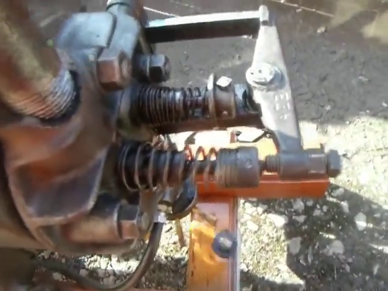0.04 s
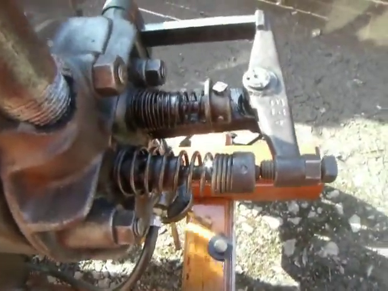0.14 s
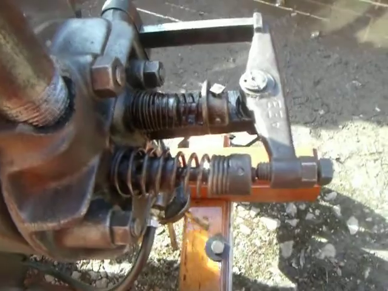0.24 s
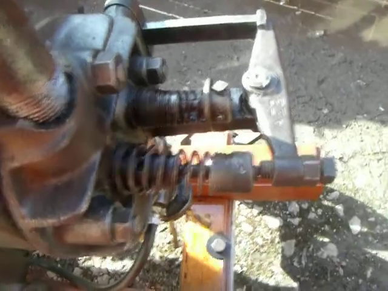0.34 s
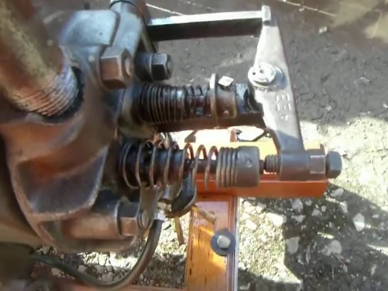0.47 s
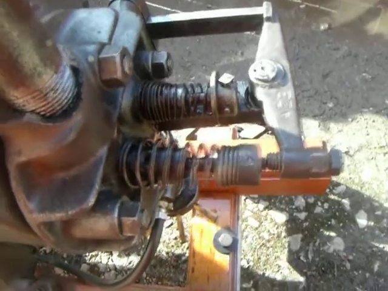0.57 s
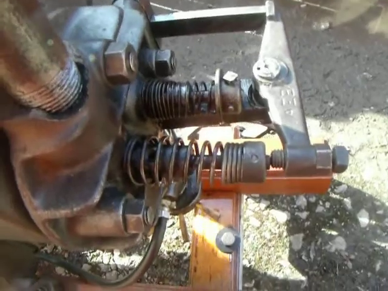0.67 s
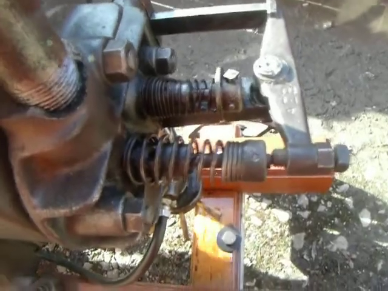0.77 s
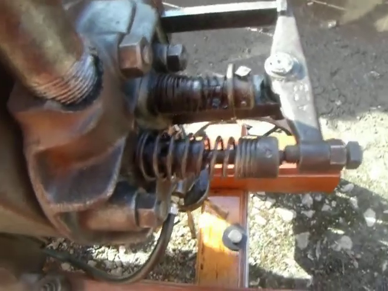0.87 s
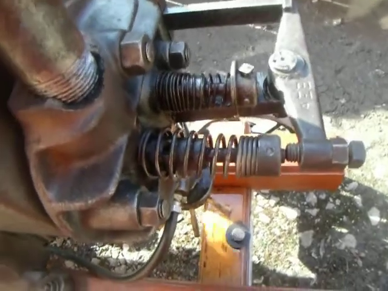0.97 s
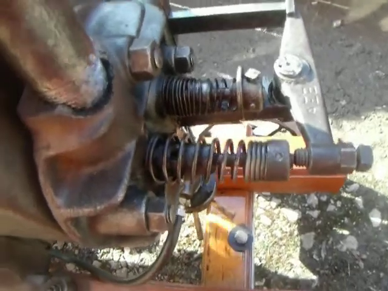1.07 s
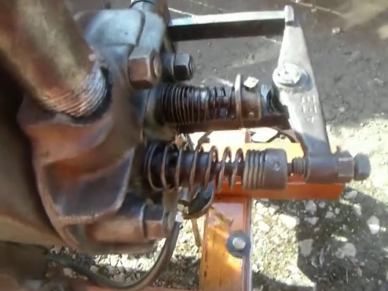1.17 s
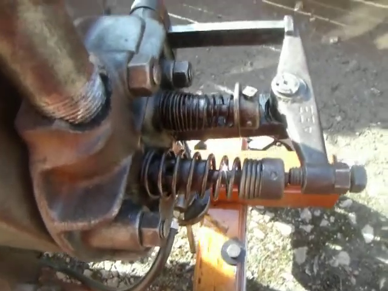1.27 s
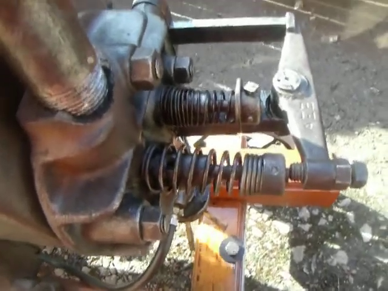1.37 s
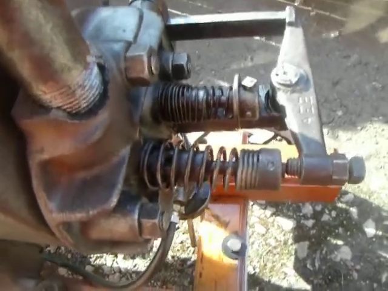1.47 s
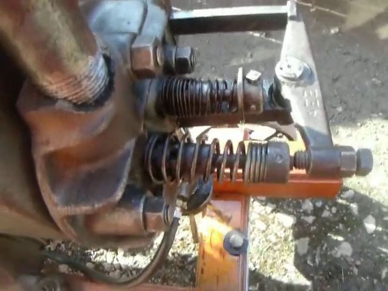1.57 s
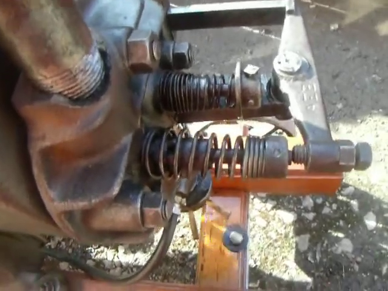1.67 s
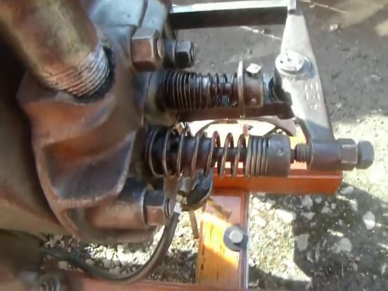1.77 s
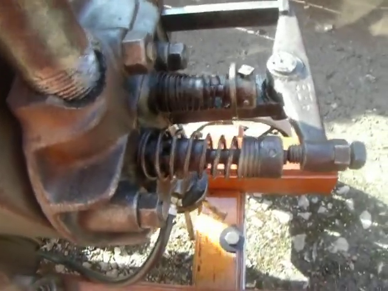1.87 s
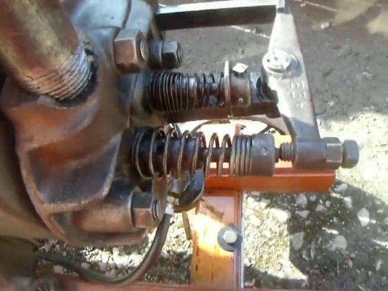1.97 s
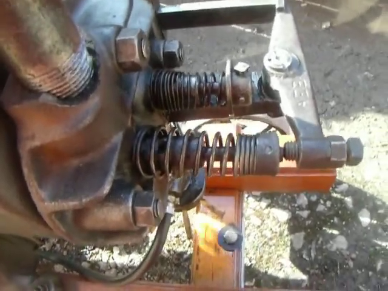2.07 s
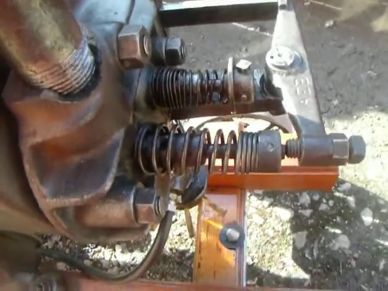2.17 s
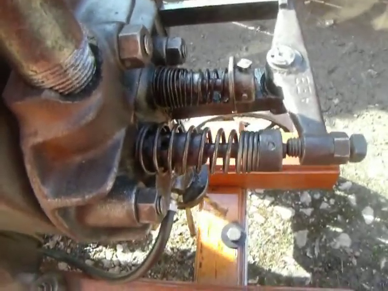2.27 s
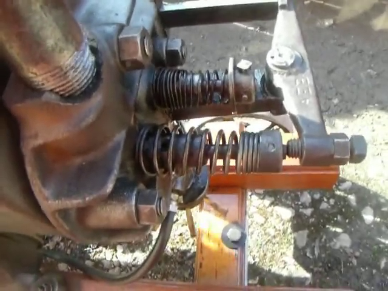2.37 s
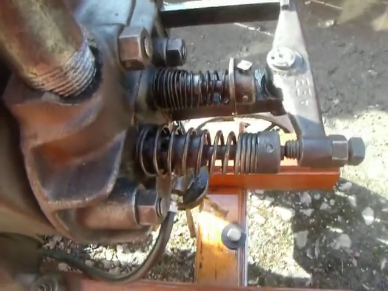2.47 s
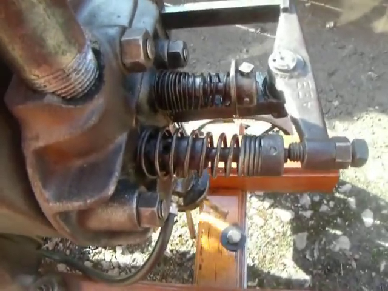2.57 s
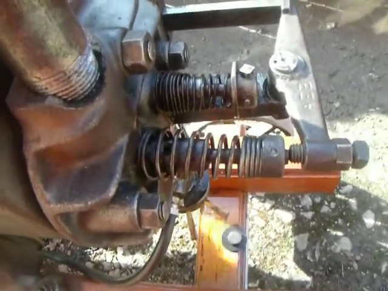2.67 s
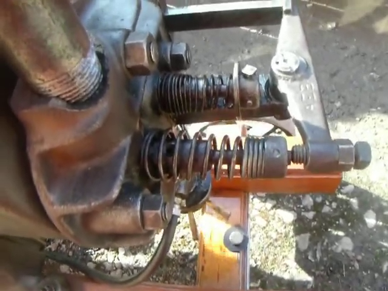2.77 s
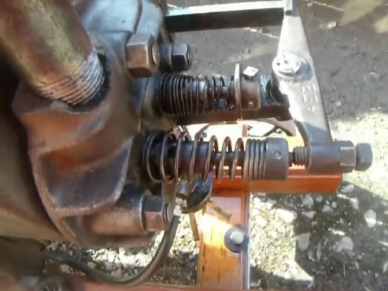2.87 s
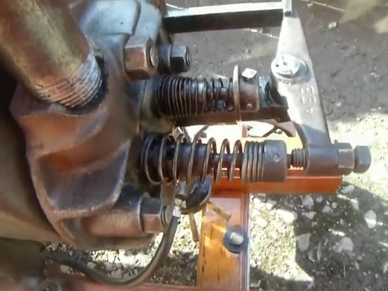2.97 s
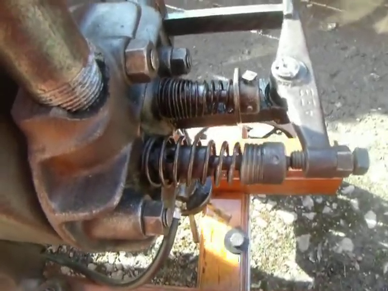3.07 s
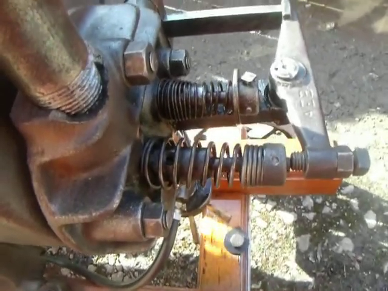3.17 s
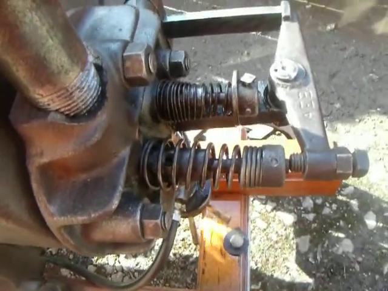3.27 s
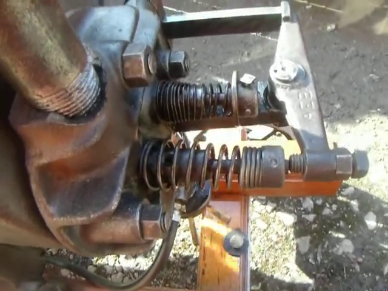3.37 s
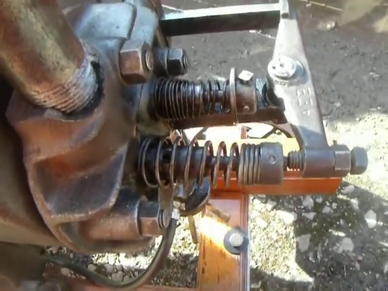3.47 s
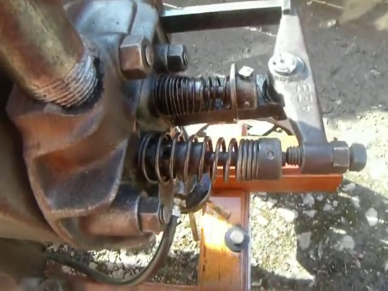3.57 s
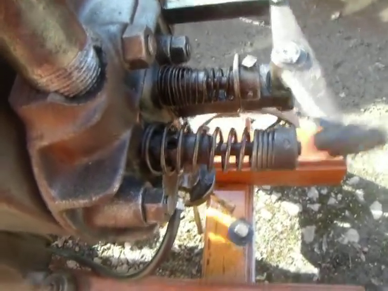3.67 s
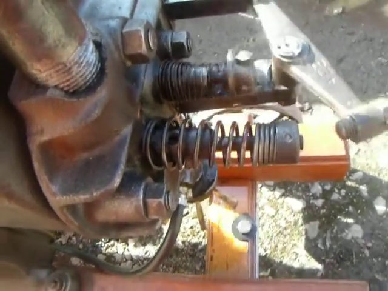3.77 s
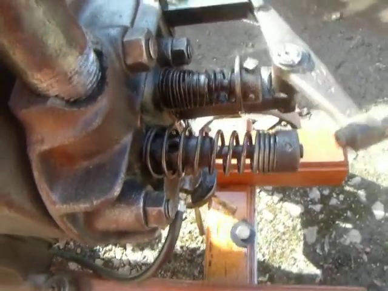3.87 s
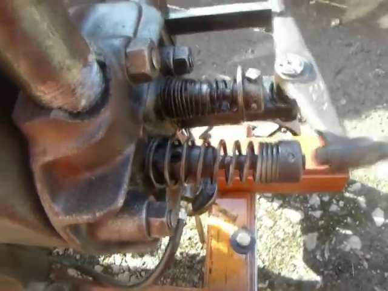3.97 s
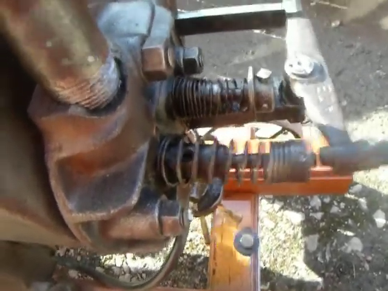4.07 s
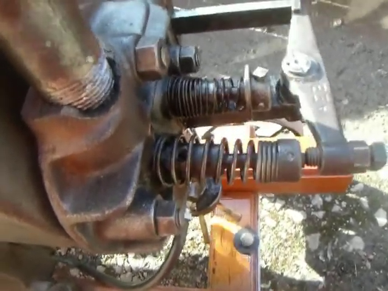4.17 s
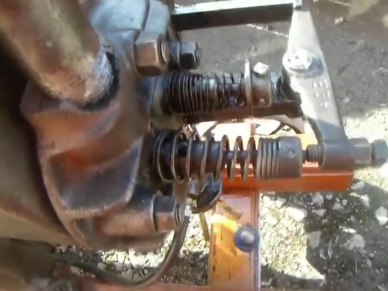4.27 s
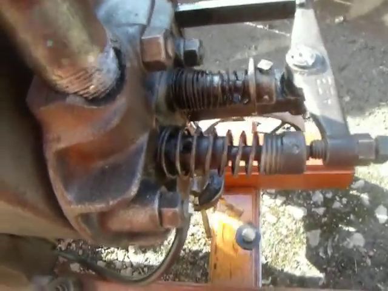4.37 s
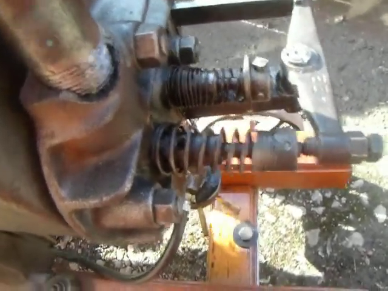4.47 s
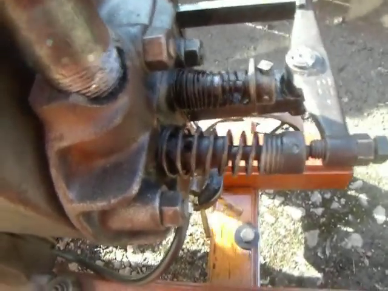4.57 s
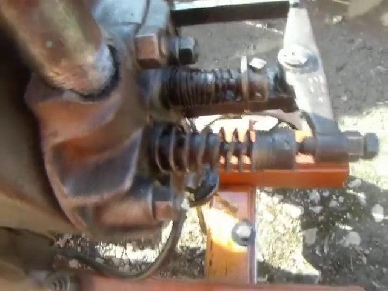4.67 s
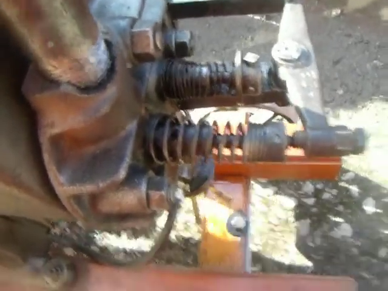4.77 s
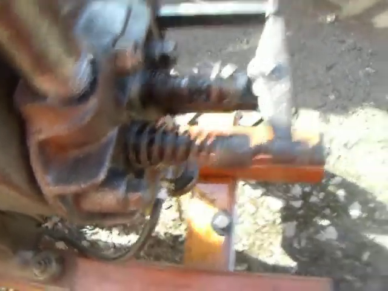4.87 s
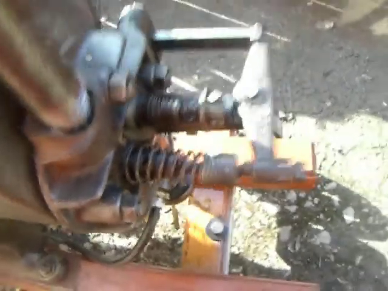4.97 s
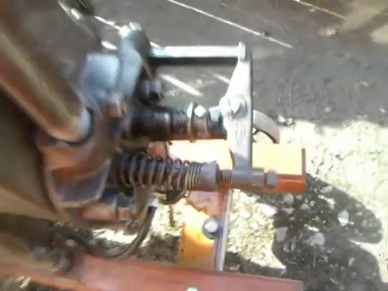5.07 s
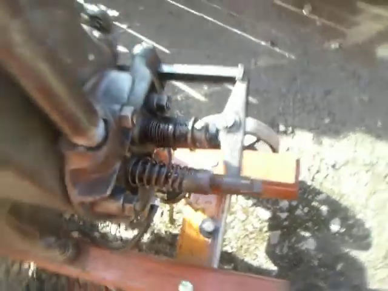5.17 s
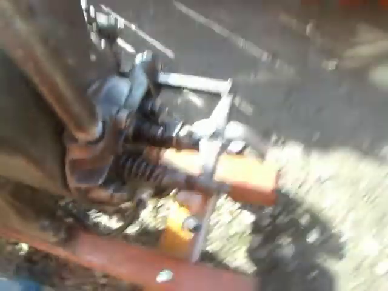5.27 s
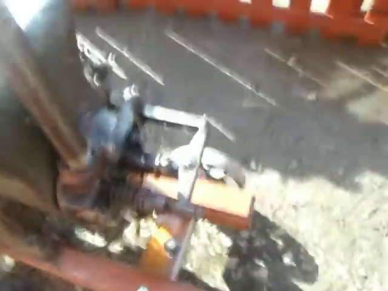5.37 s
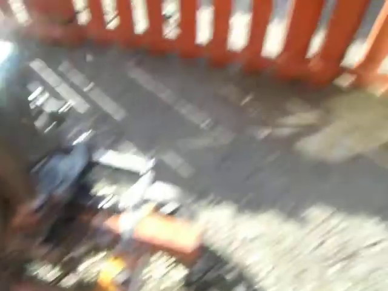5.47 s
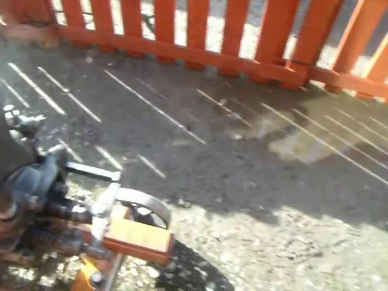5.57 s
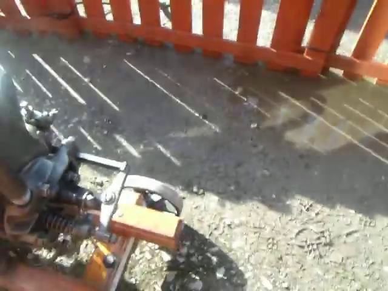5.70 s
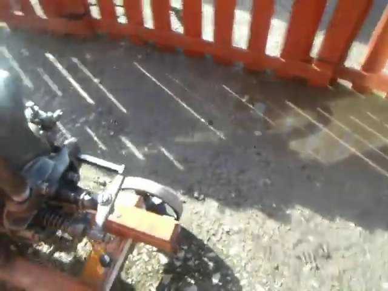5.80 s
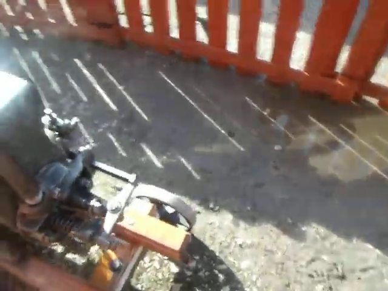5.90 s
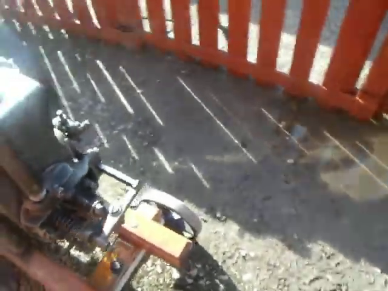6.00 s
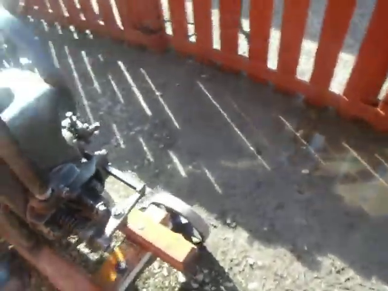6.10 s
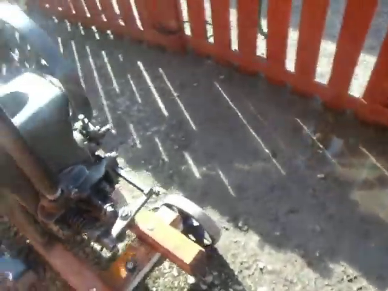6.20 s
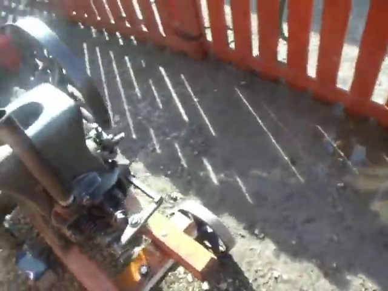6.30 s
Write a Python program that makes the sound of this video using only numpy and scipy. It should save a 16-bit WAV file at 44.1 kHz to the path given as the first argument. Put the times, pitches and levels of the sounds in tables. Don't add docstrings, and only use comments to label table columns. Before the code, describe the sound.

Rapid iron valve-gear clatter and breathy pipe puffs from a coasting engine, one overloaded bang midway, over fast chugging and slow deep thumps.

```python
import sys
import numpy as np
from scipy import signal
from scipy.io import wavfile
from scipy.ndimage import uniform_filter1d

SR = 44100
rng = np.random.default_rng(int(sys.argv[2]) if len(sys.argv) > 2 else 0)


def boost(x):
    u = np.asarray(x, float) / 20
    return 10 ** u


def pcm_store(signal):
    levels = np.round(np.clip(np.atleast_2d(signal), -1, 1) * 32767)
    wavfile.write(sys.argv[1], SR, levels.astype(np.int16).T)


N = 279594


def evened(x):
    return x / np.sqrt(np.mean(x ** 2) + 1e-20)


def steadied(x, share):
    return evened(x / (uniform_filter1d(x ** 2, size=500) + .02) ** (share / 2))


def clock(s):
    return np.arange(round(s * SR)) / SR


def curve(points):
    return np.interp(np.arange(N) / SR, *np.transpose(points))


def add(mix, s, sound):
    at = round(s * SR)
    sound = sound[max(-at, 0):]
    part = mix[max(at, 0):][:len(sound)]
    part += sound[:len(part)]


def band(lo_hz, hi_hz):
    sos = signal.butter(2, [lo_hz, hi_hz], "band", fs=SR, output="sos")
    return evened(signal.sosfilt(sos, rng.standard_normal(N)))


def resonate(x, hz, width_hz):
    turn = np.exp(2j * np.pi * np.cumsum(hz * np.ones(len(x))) / SR)
    r = np.exp(-np.pi * width_hz / SR)
    return 2 * (turn * signal.lfilter([1 - r], [1, -r], x / turn)).real


def struck(t, hz, db, t60):
    return boost(db - 60 * t / t60) * np.sin(2 * np.pi * hz * t)


def gusts(per_s, spread_db):
    flutter = uniform_filter1d(rng.standard_normal(N), max(int(SR / per_s), 1))
    return boost(spread_db * evened(flutter))


def swells(rows, sharp):
    flow = np.zeros((len(rows[0]) - 2, N))
    for s, *level_db, length_s in rows:
        t = clock(length_s)
        for part, db in zip(flow, level_db):
            add(part, s - length_s / 2, boost(db) * np.sin(np.pi * t / length_s) ** sharp)
    return flow


def pipe(modes, lo_hz, hi_hz, hiss_db):
    air, tones = rng.standard_normal(N), np.zeros(N)
    for k, (hz, width_hz, db) in enumerate(modes):
        if lo_hz < hz < hi_hz:
            tones += (-1) ** k * boost(db) / np.sqrt(width_hz) * resonate(air, hz, width_hz)
    return evened(evened(tones) + boost(hiss_db) * band(max(lo_hz, 900), hi_hz))


# (time [s], knock [dB], valve-seat whistle [dB], lower pipe tones [dB])
CAM = [(-.29, -6, -28.5, -22), (0.1485, -7.5, -30, -25), (0.599, -5, -29, -24), (1.0663, -6, -29.5, -27.5),
       (1.549, -6, -30.5, -27), (2.048, -4, -32.5, -30), (2.5631, -6, -31, -29), (3.101, -7.5, -35, -30),
       (3.658, -7.5, -34, -28), (4.17, -13, -26, -24), (4.5466, -4.5, -27, -23.5),
       (4.927, -6.5, -26, -22.5), (5.312, -18, -29, -24.5), (5.7156, -9.5, -32.5, -27),
       (6.126, -12, -40, -18), (6.54, -9, -38, -30)]
DRAW_AT = (0.18, 0.686)


def draws():
    rows = []
    for (s, _, seat_db, low_db), after in zip(CAM, CAM[1:]):
        turn_s = after[0] - s
        rows += [(s + at * turn_s, seat_db, low_db, 0.18 * turn_s) for at in DRAW_AT]
    return rows


# (centre [s], low tones [dB], upper tones [dB], treble [dB], length [s])
BLOWS = [(0.359, -19.5, -23.5, -30.5, 0.068), (0.822, -17, -23, -32, 0.057),
         (1.286, -21.5, -25.5, -33, 0.07), (1.775, -20.5, -29, -32.5, 0.072),
         (2.284, -23, -30.5, -35, 0.081), (2.811, -23.5, -31.5, -34.5, 0.092),
         (3.365, -22, -38, -39, 0.092), (4.345, -15, -21.5, -28.5, 0.057),
         (4.722, -15, -22.5, -25.5, 0.057), (5.103, -14, -16.5, -27.5, 0.067),
         (5.495, -19.5, -21, -30.5, 0.078), (5.905, -22.5, -22.5, -34, 0.063),
         (6.322, -25, -26.5, -36.5, 0.057)]
# (centre [s], low [dB], upper [dB], treble [dB], length [s])
GASPS = [(0.153, -29, -24, -39.5, 0.019), (0.898, -18.5, -22, -29, 0.065), (3.853, -22, -19, -27.5, 0.076),
         (4.171, -22.5, -26, -27.5, 0.12), (4.525, -25, -33, -44, 0.046), (4.9, -31, -35, -43, 0.13),
         (5.31, -19.5, -30, -50, 0.081), (5.69, -30.5, -35, -45, 0.1), (6.19, -19.5, -17, -35, 0.046),
         (3.735, -35.5, -33, -35, 0.14), (6.215, -25, -28, -41, .05)]
# (frequency [Hz], width [Hz], level [dB])
PIPE_OUT = [(547, 130, 1), (936, 210, 6), (1399, 12, 1.5), (1850, 69, 5.5), (2294, 58, 5), (2815, 50, 4.5),
            (3250, 41, -6), (3540, 59, -25), (4440, 83, -13.5), (4503, 140, -14.5), (5064, 180, -14.5)]
# (frequency [Hz], width [Hz], level [dB])
PIPE_IN = [(1300, 90, 0), (1800, 17, 0.5), (2210, 48, -7), (2770, 60, -18), (3150, 42, -24),
           (3780, 70, -13), (4250, 98, -12.5), (4920, 200, -8.5)]
# (frequency [Hz], width [Hz], level [dB])
INLET = [(1429, 19, -1.5), (1995, 74, -4.5), (2260, 40, -4), (2520, 32, -11), (2625, 18, -4.5),
         (3040, 32, -8.5), (3350, 32, -10), (3900, 110, -10.5), (4760, 42, -14)]


def breathing():
    parts_hz = [(400, 2100), (2100, 3500), (3500, 5600)]
    tones = np.array([pipe(PIPE_OUT, lo, hi, db) for (lo, hi), db in zip(parts_hz, (-13.0, -14.0, -3.0))])
    hiss = np.array([pipe(INLET, lo, hi, -4) for lo, hi in parts_hz])
    out = (swells(BLOWS, 1.48) * tones).sum(0) * gusts(250, 0.73)
    out += (swells(GASPS, 2.3) * hiss).sum(0) * gusts(150, 1.6)
    seat, lower = swells(draws(), 0.99)
    back = seat * pipe(PIPE_IN, 2900, 6700, -1.3) + lower * pipe(PIPE_IN, 890, 3500, -17.5)
    return boost(0.5) * out + boost(-4.5) * back * gusts(200, 0.54)


# (centre [s], frequency [Hz], level [dB], length [s])
SINGS = [(.355, 882, -17, .025), (.359, 1844, -19, .025), (.365, 261, -14.5, .07), (.43, 254, -20, .06),
         (.535, 350, -15.5, .035), (.61, 949, -18, .025), (.823, 2842, -18, .035), (.826, 1900, -17, .035),
         (.886, 2885, -22, .015), (.894, 1800, -17, .02), (1.555, 4400, -22, .014),
         (1.552, 3840, -23, .014), (1.63, 1850, -26, .045), (1.765, 2800, -23, .03),
         (1.783, 1900, -23, .03), (2.055, 1276, -19, .02), (3.015, 330, -13.5, .025),
         (3.105, 2045, -15, .016), (3.104, 615, -17, .012), (3.66, 1378, -17, .025),
         (3.664, 2150, -21, .015), (3.843, 1808, -16.5, .018), (3.849, 2520, -20, .015),
         (3.851, 3509, -19, .015), (3.853, 1263, -16, .02), (3.871, 1485, -17, .02),
         (4.003, 1981, -20, .018), (4.111, 1184, -13, .015), (4.112, 2040, -11.5, .018),
         (4.107, 4494, -16, .014), (4.179, 796, -13, .02), (4.346, 2540, -22, .02), (4.352, 2026, -17, .02),
         (4.356, 1102, -16, .02), (4.546, 2368, -20, .015), (4.554, 944, -14, .02),
         (4.741, 1920, -17, .025), (4.911, 539, -12, .03), (5.086, 2330, -19, .03), (5.094, 1340, -16, .02),
         (5.098, 2820, -16, .025), (5.114, 1330, -18, .02), (5.118, 2310, -17.5, .025),
         (5.31, 560, -15, .025), (5.905, 1870, -18, .04), (5.912, 2850, -22.5, .035),
         (6.154, 1399, -20, .025), (6.186, 1225, -16, .02), (6.2, 640, -20, .025)]


def sings():
    mix = np.zeros(N)
    for s, hz, db, length_s in SINGS:
        t = clock(length_s)
        swell = np.sin(np.pi * t / length_s) ** 2
        add(mix, s - length_s / 2, boost(db) * swell * np.sin(2 * np.pi * hz * t))
    return mix


# (centre [s], level [dB], length [s])
BOOMS = [(.08, -19, 0.21), (.35, -13, 0.15), (.5, -23.5, 0.47), (.73, -17, 0.15), (.9, -16.5, 0.12),
         (1.05, -14.5, 0.14), (1.245, -13, 0.11), (1.45, -23, 0.94), (1.82, -16.5, 0.23),
         (2.05, -20.5, 0.07), (2.15, -10, .12), (2.34, -23, 0.054), (2.55, -17, 0.24), (2.83, -35, 0.26),
         (3.05, -14, 0.28), (3.36, -10.5, 0.066), (3.48, -17, 0.19), (3.63, -25.5, 0.11),
         (3.88, -17.5, 0.63), (4.08, -18.5, .24), (4.34, -17.5, 0.44), (4.54, -12.5, 0.14),
         (4.79, -14.5, 0.29), (4.93, -15, 0.092), (5.27, -18, 0.41), (5.68, -14, 0.14), (5.98, -22.5, 1),
         (6.27, -31, 0.5)]
# (centre [s], level [dB], length [s])
ROARS = [(.14, -7.5, 0.096), (.35, -9.5, 0.13), (.55, -12, 0.14), (.8, -15.5, 0.22), (.91, -12.5, 0.085),
         (1.06, -8, 0.12), (1.28, -10.5, 0.17), (1.52, -12.5, 0.12), (1.775, -15.5, 0.13), (2.03, -17, 0.2),
         (2.15, -14, 0.14), (2.28, -15.5, .1), (2.55, -15, 0.14), (2.8, -16.5, 0.15), (3.04, -17.5, 0.21),
         (3.36, -17.5, 0.12), (3.49, -20, 0.1), (3.63, -16.5, 0.1), (3.87, -12, 0.22), (4.16, -10.5, 0.21),
         (4.33, -10, 0.2), (4.53, -8.5, 0.14), (4.71, -11, 0.098), (4.84, -13.5, 0.48), (5.1, -22.5, 0.6),
         (5.31, -8, 0.088), (5.49, -20, 0.094), (5.69, -15.5, 0.11), (5.93, -31, 0.93), (6.22, -22.5, 0.51)]


def churn():
    cavity_hz, slide_hz, slide_at_turns = 252.3, 12, .4
    turns = curve([(row[0], k) for k, row in enumerate(CAM)])
    hz = cavity_hz + slide_hz * np.cos(2 * 2 * np.pi * (turns - slide_at_turns))
    air = rng.standard_normal(N)
    hum = steadied(evened(resonate(resonate(air, hz, 100), hz, 150)), .6)
    boom = hum * (swells(BOOMS, 1.3)[0] + boost(-31.5))
    roar = evened(resonate(air, 2 * hz, 45)) * boost(-2.0) + band(260, 1290)
    roar *= swells(ROARS, 2.17)[0] + boost(-30)
    return (boost(-7.5) * boom + boost(-11.0) * roar) * gusts(120, 2.1)


# (time [s], peak [dB], ring [Hz])
PUSHROD = [(0.072, -12, 2400), (0.5203, -16.5, 1520), (0.985, -11, 2100), (1.4708, -13, 2820),
           (1.9683, -15, 1600), (2.477, -17, 1740), (3.0088, -15.5, 2140), (3.575, -16, 2260),
           (4.046, -13.5, 1800), (4.479, -12.5, 2100), (4.86, -12.5, 2230), (5.248, -11.5, 1490),
           (5.6467, -11.5, 1490), (6.0555, -18.5, 2040)]
# (time [s], peak [dB], ring [Hz], clunk over peak [dB], rebound [dB])
CLACKS = [(0.8837, -9.5, 3350, -39, -2), (1.705, -20.5, 1980, -6, 0), (3.678, -11.5, 4960, -15.5, -13),
          (3.7803, -23, 2040, -17, -15), (3.8274, -21, 2180, -18, -16), (3.84, -5, 3200, -6, 0),
          (3.927, -13.5, 1900, -9, -13), (3.9464, -19, 3060, -4, -17), (3.9881, -2, 2160, -3, -8),
          (4.0227, -7, 2290, 2, -14), (4.0833, -9, 2200, -11.5, -15), (4.232, -7.5, 1540, 3.5, -1.5),
          (4.2908, -13, 1510, -18, 0), (6.1808, -1.5, 2480, -9, -7), (6.2685, -25, 5000, -18, -25)]


def hits():
    latch = [(s, db, 1900, 3.5, -3, 0.081) for s, db, *_ in CAM if 0 < s < N / SR]
    rod = [(*row, 7.5, -2.5, 0.11) for row in PUSHROD]
    return latch + rod + [(*row, 0.079) for row in CLACKS]


# (frequency [Hz], level [dB], t60 [s])
CASTING = [(564, -0.5, 0.038), (673, 1.5, 0.029), (964, -5.5, 0.067), (1416, 2, 0.022)]
# (time [s], frequency [Hz], level [dB], t60 [s])
PIPE_RING = [
    (3.6802, 233, 1.5, 0.085),
    (3.6802, 236, -8, .3),
    (3.68, 748, -5.5, 0.14),
    (3.1, 450, -22, 0.088),
]
# (time [s], frequency [Hz], level [dB], t60 [s])
THUDS = [(.126, 550, -13, .03), (1.637, 600, -16, .025), (2.476, 650, -15, .025), (2.565, 560, -13, .03),
         (3.806, 420, -11, .02), (4.976, 520, -13, .03), (5.08, 540, -12, .04), (5.478, 615, -13, .03),
         (5.647, 520, -9, .04), (5.648, 1300, -10, .012), (4.9765, 1000, -11, .01), (4.642, 900, -12, .01),
         (5.984, 560, -14, .03), (5.817, 550, -13, .04)]
# (time [s], frequency [Hz], level [dB], t60 [s])
ROCKS = [(2.27, 60, -20, .2), (3.83, 50, -18, .25), (3.96, 55, -18, .2), (4.52, 55, -17, .25),
         (4.69, 50, -18, .25), (5.41, 45, -18, .25), (5.97, 50, -16, .25)]


def knocks():
    mix, t, rows = np.zeros(N), clock(.15), hits()
    bands_hz = (1900, 3920), (1200, 8000), (240, 1300)
    crack, rattle, rumble = (np.pad(band(lo, hi), (0, len(t))) for lo, hi in bands_hz)
    for (s, db, hz, clunk_db, rebound_db, t60), luck in zip(rows, rng.random((len(rows), 6))):
        at = slice(round(s * SR), round(s * SR) + len(t))
        blow = boost(-7.5) * crack[at] * boost(-60 * t / 0.03) + struck(t, hz, -6, 0.036)
        for (mode_hz, mode_db, ring_s), u in zip(CASTING, luck[2:]):
            blow = blow + struck(t, mode_hz * (0.94 + 0.094 * u), clunk_db + mode_db - 8.5, ring_s)
        blow = blow * np.minimum(t / .0022, 1)
        trail = boost(-12.0) * rattle[at] + boost(clunk_db - 9.0) * rumble[at]
        trail = trail * boost(-60 * t / t60) * np.minimum(t / 0.019, 1)
        add(mix, s - .0045, boost(db + rebound_db - 8.5) * blow)
        add(mix, s, boost(db) * (blow + trail))
        add(mix, s + 0.0045 + 0.0052 * luck[0], boost(db + rebound_db - 2.5) * blow)
        add(mix, s + .011 + .005 * luck[1], -boost(db + rebound_db - 8.5) * blow)
    for s, hz, db, t60 in PIPE_RING + THUDS + ROCKS:
        add(mix, s, struck(clock(.3), hz, db, t60))
    return mix


# (time [s], peak [dB], ring [Hz])
SNAPS = [(0.0717, -18, 4400), (0.1161, -23, 3360), (0.1476, -18, 3820), (0.3401, -12, 3350),
         (0.5217, -19, 4390), (0.601, -15, 4700), (0.7981, -19, 3440), (1.0675, -22, 3670),
         (1.5502, -15, 3900), (1.7479, -23, 3840), (2.05, -13, 3860), (2.5656, -12, 3780),
         (3.0081, -25, 3840), (3.1004, -14, 4260), (3.5673, -28, 3210), (3.6788, -8.5, 4900),
         (3.7808, -22, 4500), (3.8287, -14, 4400), (3.9469, -22, 4040), (3.9874, -1, 3530),
         (4.0228, -18, 3470), (4.0462, -21, 3660), (4.0841, -14, 4370), (4.095, -3, 4300),
         (4.2353, -20, 3850), (4.4797, -15, 3200), (4.5457, -14, 4200), (4.593, -20, 4940),
         (4.7112, -14, 4860), (4.8594, -16, 4330), (5.0873, -18, 3250), (5.247, -23, 3230),
         (5.4834, -16, 3340), (5.5692, -21, 4820), (5.6476, -23, 3500), (5.8785, -21, 3340),
         (6.0282, -24, 3830), (6.1823, -11, 3370), (6.2677, -25, 3250)]
# (time [s], frequency [Hz], level [dB], t60 [s])
VALVE_RING = [(3.989, 3480, -9, 0.027), (3.9932, 3510, -4, 0.037), (3.9932, 5500, -15, 0.026),
              (.8995, 1420, -12, .06), (.879, 3973, -17.5, 0.075), (4.514, 975, -10, .07),
              (4.415, 1090, -18.5, .05), (5.6, 1400, -19, 0.14), (6.181, 2250, -6.5, .04),
              (.128, 2950, -15, .04), (.57, 1880, -22, .12), (.612, 3900, -19, .04), (.01, 1900, -19, .06),
              (5.672, 290, -12, .1), (5.72, 330, -15, .08), (4.78, 275, -14, .08), (4.545, 320, -15, .08),
              (6.186, 2580, -8, .04), (6.178, 2900, -13, .03), (3.838, 3000, -13, .05),
              (3.008, 2500, -19.5, .04), (2.93, 1700, -23.5, 0.092)]


def snaps():
    mix, t = np.zeros(N), clock(.05)
    for (s, db, hz), grit in zip(SNAPS, rng.standard_normal((len(SNAPS), len(t)))):
        splinter = boost(-3.0) * np.diff(grit, prepend=0) * boost(-60 * t / 0.011)
        add(mix, s, boost(db - 2) * (splinter + struck(t, hz, -2, .016)) * np.minimum(t / .0006, 1))
    t = clock(.1)
    for s, hz, db, t60 in VALVE_RING:
        add(mix, s, struck(t, hz, db, t60) * np.minimum(t / 0.0017, 1))
    return mix


# (time [s], level [dB])
NEAR = [
    (0, -0.5),
    (3.5, -4.5),
    (4.2, 1.5),
    (5.2, 3.5),
    (5.7, -1),
    (6.34, 2),
]


def chatter():
    ticks_per_s, lift_db, parts = 2200, 4, 16
    lift = swells([(s + 0.047, lift_db, .1) for s, *_ in PUSHROD], 0.57)[0] + 1
    size = boost(3.2 * np.minimum(rng.exponential(1, N), 3.5)) * (rng.random(N) < ticks_per_s / SR)
    part, t, ticks = rng.integers(0, parts, N), clock(.02), np.zeros(N)
    for k, hz in enumerate(np.geomspace(1300, 4800, parts)):
        ring = struck(t, hz, -5.0 * np.log2(hz / 2000), .008)
        ticks += signal.oaconvolve(size * (part == k), ring)[:N]
    return boost(-39.5 + curve(NEAR)) * lift * evened(ticks)


def sweep(from_hz, to_hz, glide_s, rise_s, t60):
    t = clock(.2)
    turns = to_hz * t - (to_hz - from_hz) * glide_s * (1 - np.exp(-t / glide_s))
    return -np.sin(2 * np.pi * turns) * (1 - np.exp(-t / rise_s)) * boost(-60 * t / t60)


def bang():
    from_hz, to_hz, fall_s = 2500, 1080, 0.015
    mix, t = np.zeros(N), clock(0.079)
    gas = band(700, 5300)[:len(t)]
    jet_hz = to_hz + (from_hz - to_hz) * np.clip(1 - t / fall_s, 0, 1)
    jet = evened(resonate(gas, jet_hz, 700)) + boost(-2.0) * gas
    blast = jet * np.where(t < .02, 1, boost(-7 - 60 * (t - .02) / .2)) * np.minimum(t / .0015, 1)
    add(mix, 4.0968, struck(t, 240, 10, .03))
    add(mix, 4.0998, boost(-5) * blast)
    add(mix, 4.1205, -boost(13) * sweep(45, 117, .0055, .001, .095))
    return mix


# (time [s], push over usual [dB], spit over usual [dB])
FIRINGS = [(0.13, 0.1, 0.2), (0.2974, 0, 0.5), (0.4634, -1.5, -1.5), (0.6311, -0.5, -4), (0.7997, 1.2, 2),
           (0.968, -1.2, -1), (1.1356, 0, -1), (1.3045, -0.7, -2.9), (1.4741, 1, 3.5), (1.6406, 0.5, 1),
           (1.809, 1, 1.5), (1.977, 0.3, 3.6), (2.1437, -1, 0.5), (2.3112, -2.5, -0.5), (2.4803, 0.5, -2.2),
           (2.6475, 0, -0.5), (2.8125, 0.7, -1), (2.978, -0.5, 0), (3.1454, -2, -6), (3.3126, -0.5, -0.5),
           (3.4777, 0.5, -5), (3.6433, -1.8, -15), (3.811, 1.5, 0), (3.9773, 0, 3), (4.144, -4.5, -6),
           (4.3096, 0.1, 0), (4.479, -1.5, 1.5), (4.645, 0.5, 2.5), (4.8104, -5, -2.4), (4.979, 0.5, -1),
           (5.1471, 0, 5.5), (5.315, -2, 2), (5.4827, -3.5, 1), (5.6524, -0.5, 0.5), (5.8212, 1.6, 5),
           (5.988, -1.5, -1), (6.156, -2, 4), (6.3249, -1.5, 2)]


def firings():
    usual_db, uneven_db = [-9.5, -18.5], 0.23
    rows = np.array(FIRINGS)
    level_db = rows[:, 1:] + usual_db + uneven_db * rng.standard_normal((len(rows), 2))
    return np.column_stack([rows[:, 0], level_db])


def fast_neighbour():
    mix, t, front = np.zeros(N), clock(0.074), clock(0.0026)
    gas = resonate(band(2400, 3400), 2800, 450) + boost(-8) * resonate(band(3400, 4300), 3850, 500)
    gas, slap = np.pad(gas, (0, len(t))), np.pad(band(270, 1300), (0, len(t)))
    ramp = (.35 + .65 * front / front[-1]) * np.minimum((front[-1] - front) / .0004, 1)
    pulse = sweep(20, 190, 0.0047, .002, 0.085) * np.clip((.023 - clock(.2)) / .006, 0, 1)
    for s, push_db, spit_db in firings():
        at = slice(round(s * SR), round(s * SR) + len(t))
        add(mix, s - .0038, boost(push_db - 1) * ramp)
        add(mix, s - .0035, boost(push_db - 7) * slap[at] * np.minimum(t / .001, 1) * boost(-60 * t / .045))
        add(mix, s - .0025, struck(t, 560, push_db - 13, .03))
        add(mix, s - .002, boost(spit_db + 5) * gas[at] * t / .0035 * np.exp(-t / 0.0033))
        add(mix, s + .0009, boost(push_db + 5) * pulse)
        add(mix, s + .006, boost(push_db - 8) * np.hanning(round(.006 * SR)))
        add(mix, s + .0185, struck(t, 230, push_db - 10, .09))
    return mix


# (time [s], level [dB])
THUMPS = [
    (-.1, -33),
    (0.785, -8.5),
    (1.675, -10),
    (2.563, -9.5),
    (3.449, -12),
    (4.336, -8.5),
    (5.226, -12.5),
    (6.119, -10),
]


def slow_neighbour():
    mix = np.zeros(N)
    pulse = sweep(38, 45, .01, 0.0041, 0.37) * np.clip((.11 - clock(.2)) / 0.029, 0, 1)
    for s, db in THUMPS:
        add(mix, s - .003, -boost(db - 3.5) * np.hanning(round(.011 * SR)))
        add(mix, s - .003, boost(db + 2.0) * pulse)
    return mix


# (frequency [Hz], density [dB per Hz])
YARD = [(12, -28.5), (20, 6), (192, -3.5), (530, -6.5), (978, -13), (1200, -17.5), (2030, -20.5),
        (5600, -40)]
# (time [s], level [dB])
YARD_LEVEL = [(0, 0), (1, 0), (2, 0), (3, -1), (3.6, -1), (4.2, -1), (4.8, -1), (5.4, 0), (5.9, -2),
              (6.34, 0)]


def yard():
    frames, hz = N // 256 + 5, np.fft.rfftfreq(1024, 1 / SR)
    a, b, patches = rng.standard_normal((frames, 513, 3)).T
    patches = evened(uniform_filter1d(uniform_filter1d(patches, 8, 0), 8, 1))
    f, level_db = np.transpose(YARD)
    shape_db = np.interp(np.log(hz + 1), np.log(f + 1), level_db)
    patchy_db = 2.0 * np.clip(hz / 400, .3, 1)
    z = (a + 1j * b) * boost(shape_db[:, None] + patchy_db[:, None] * patches)
    noise = evened(signal.istft(z, nperseg=1024, noverlap=768)[1][:N])
    return boost(-22 + curve(YARD_LEVEL)) * noise


def scene():
    engine = breathing() + sings() + churn() + knocks() + snaps() + chatter() + bang()
    return (engine + fast_neighbour() + slow_neighbour() + yard())[None]


def low_pass(x):
    return signal.sosfilt(signal.butter(12, 15870, fs=SR, output="sos"), x)


def record(dry):
    edge = signal.firwin(181, 5400, window=("kaiser", 3), fs=SR)
    image = signal.firwin(145, 5520, window=("kaiser", 10), fs=SR)
    smooth = signal.oaconvolve(dry, edge[None], "same")
    sparse = np.zeros_like(dry)
    sparse[:, ::4] = 4 * np.clip(smooth[:, ::4], -.61, .66)
    full = signal.oaconvolve(sparse, image[None], "same")
    return low_pass(np.clip(full, -.72, .74))


dry = scene()
out = record(dry)
pcm_store(out)
```